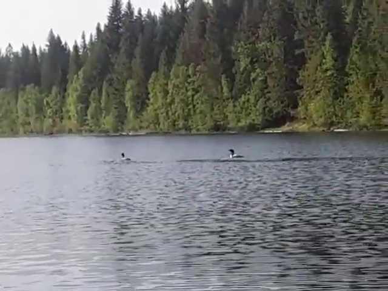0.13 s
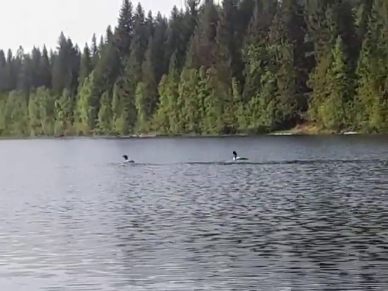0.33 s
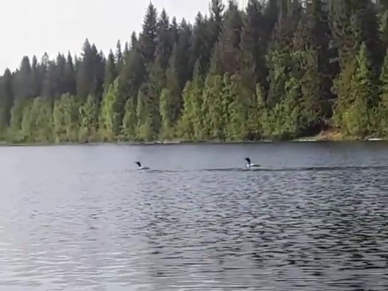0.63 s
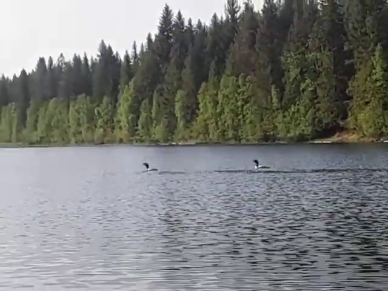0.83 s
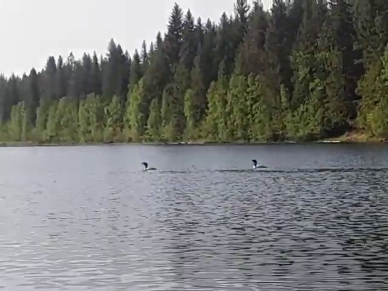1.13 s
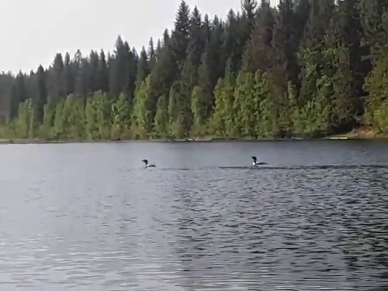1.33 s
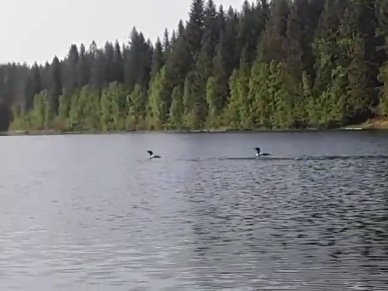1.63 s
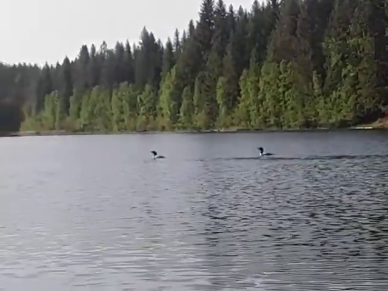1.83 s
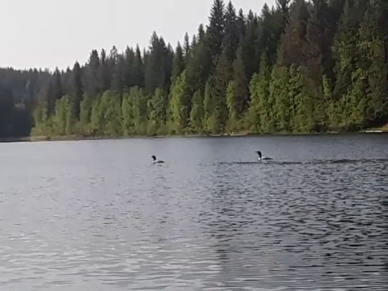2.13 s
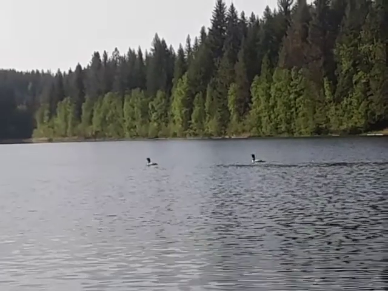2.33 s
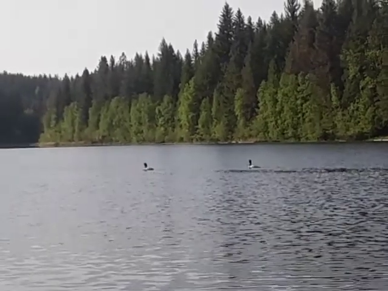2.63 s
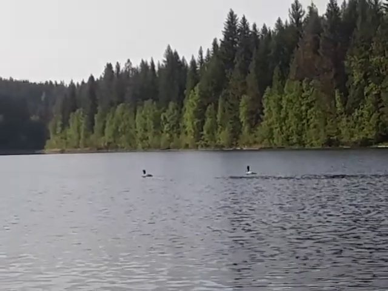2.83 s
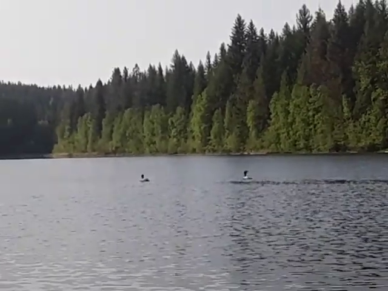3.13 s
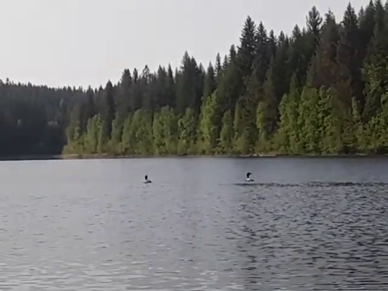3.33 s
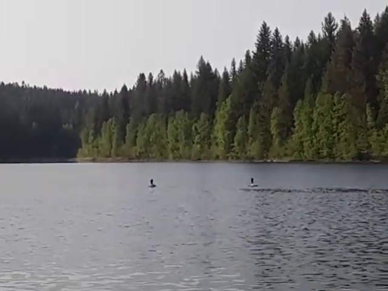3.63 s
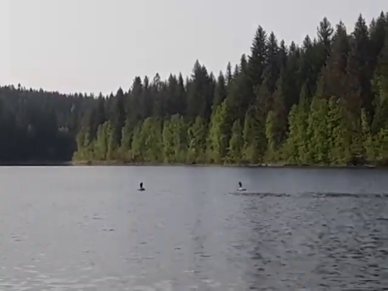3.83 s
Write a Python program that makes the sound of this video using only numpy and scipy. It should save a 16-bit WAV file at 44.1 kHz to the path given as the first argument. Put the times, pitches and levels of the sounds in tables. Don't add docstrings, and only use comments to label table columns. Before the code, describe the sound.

After a brief opening of hiss, low motor hum and a fading earlier echo, a pair of loons calls in wavering tremolo three times across an open lake, picked up by a small camera at a distance.

```python
import sys
import numpy as np
from scipy import signal
from scipy.fft import rfft, irfft
from scipy.io import wavfile
from scipy.ndimage import uniform_filter1d

SR = 44100
rng = np.random.default_rng(int(sys.argv[2]) if len(sys.argv) > 2 else 0)


def to_linear_factor(level_db):
    exponent = np.asarray(level_db, float) / 20
    return 10 ** exponent


def log_audio(samples):
    frames = np.atleast_2d(samples).T
    limited = np.clip(frames, -1, 1)
    pcm = np.round(limited * 32767).astype(np.int16)
    wavfile.write(sys.argv[1], SR, pcm)


N = 176400
LEAD_S = 1.2


def evened(x):
    return x / np.sqrt(np.mean(x ** 2) + 1e-20)


def read(points, hz):
    f, value = np.transpose(points)
    return np.interp(np.log(hz + 1), np.log(f + 1), value)


def coloured(x, points):
    count = x.shape[-1]
    return irfft(rfft(x) * to_linear_factor(read(points, np.fft.rfftfreq(count, 1 / SR))), count)


def smooth_noise(count, size):
    return evened(uniform_filter1d(uniform_filter1d(rng.standard_normal(count), size), size))


def ramp(t, seconds):
    return np.sin(np.pi / 2 * np.clip(t / seconds, 0, 1)) ** 2


# [f/Hz, level/dB per Hz]
HISS = [(25, -104), (60, -95.5), (130, -77.5), (320, -85.5), (700, -84), (1900, -109), (4000, -116),
        (15000, -118)]
# [f/Hz, likeness 0 to 1]
HISS_SAME = [(100, 0.99), (1500, .98), (4000, 0.96), (15000, .86)]


def hiss():
    hz = np.fft.rfftfreq(N, 1 / SR)
    left, other = rfft(rng.standard_normal((2, N)))
    ear_mix = np.clip(read(HISS_SAME, hz), 0, 1)
    right = ear_mix * left + np.sqrt(1 - ear_mix ** 2) * other
    return irfft(np.array([left, right]) * to_linear_factor(read(HISS, hz)) * np.sqrt(SR / 2), N)


# [f/Hz, width/Hz, level/dB]
MOTOR_BANDS = [(90.5, 14, -55.5), (107.05, 16, -51.5), (164.7, 18, -62), (207.15, 1.7, -55.5),
               (229.46, 15, -62), (310.05, 4.3, -70.5)]
# [t/s, level/dB]
RUMBLE_SWELL = [
    (0.0, -55),
    (1.22, -49),
    (1.37, -55.5),
    (2.24, -46.5),
    (2.26, -42),
    (3.27, -55),
    (3.3, -50),
    (3.98, -53),
    (4.0, -57.5),
]


def motor():
    hum_hz, hum_db, throb_db = 209.9, -54, 3.5
    hz = np.fft.rfftfreq(N, 1 / SR)
    swell_db = np.interp(np.arange(N) / SR, *np.transpose(RUMBLE_SWELL))
    swell_db = swell_db - np.mean(RUMBLE_SWELL, axis=0)[1]
    out = 0
    for f, width, db in MOTOR_BANDS:
        resonance = 1 / (1 + (2 * (hz - f) / width) ** 2) ** 1.3
        band = evened(irfft(rfft(rng.standard_normal(N)) * resonance, N))
        deep = f < 130
        out = out + to_linear_factor(db + deep * (swell_db + throb_db * smooth_noise(N, size=1500))) * band
    wavering_hz = hum_hz + 1.5 * smooth_noise(N, size=4000)
    hum = np.sin(2 * np.pi * np.cumsum(wavering_hz) / SR)
    return out + np.sqrt(2) * to_linear_factor(hum_db) * hum


# [f/Hz, level/dB]
SHORE_COLOUR = [(500, -16.5), (1100, -5), (1700, -6), (2500, 0), (5000, -26.5)]


def echo(x, start_s, rise_s, t60, ear_mix):
    t = np.arange(0, 3, 1 / SR)
    a, b = rng.standard_normal((2, len(t)))
    late = np.maximum(t - start_s, 0)
    both_ears = np.array([a + ear_mix * b, a - ear_mix * b])
    taps = both_ears * (1 - np.exp(-late / rise_s)) * to_linear_factor(-60 * late / t60)
    taps = coloured(taps / np.linalg.norm(taps[0]), SHORE_COLOUR)
    return signal.fftconvolve(x.mean(0)[None], taps, axes=1)[:, :x.shape[1]]


# [f/Hz, level/dB]
SHORE_DULL = [(1500, 1.5), (2400, -4), (4000, -11)]


def shore_echo(birds):
    tail = echo(birds, start_s=0.08, rise_s=0.46, t60=3.4, ear_mix=0.2)
    return to_linear_factor(-21.5) * coloured(tail, SHORE_DULL)


def far_echo(birds):
    return to_linear_factor(-28) * echo(birds, start_s=.56, rise_s=.04, t60=1.1, ear_mix=0.33)


def near_echo(birds):
    return to_linear_factor(-15.5) * echo(birds, start_s=0.004, rise_s=0.0013, t60=0.17, ear_mix=0.41)


MIDDLE_HZ, HIGH_HZ = 950, 1350
BREAK_S = .005
OVERTONES_DB = [
    (3, -20.5, -25, -27.5, -42, -38.5, -49.5, -56.5),
    (-28.5, -33.5, -49, -53.5, -57, -66, -77.5),
    (-46.5, -47.5, -47.5, -62, -52, -70),
]
DIP_DB = [
    -9,
    -2,
    -14,
]


def note(troughs, row, end, rise_s, fall_s, flips, bright_db, slope_db, throat, fades):
    start, crest_hz, drift, depth, level_db = row
    t = np.arange(start - BREAK_S / 2, end + BREAK_S / 2, 1 / SR)
    held, to_end = t - start, t - end
    register = int(crest_hz > MIDDLE_HZ) + int(crest_hz > HIGH_HZ)
    beat = np.interp(t, troughs, np.arange(len(troughs)))
    dip = (1 - abs(np.sin(np.pi * beat)) ** 1.4) ** 1.3
    hz = (crest_hz + drift * held) * (1 - depth * dip)
    hz = hz * (1 + 0.0026 * smooth_noise(len(t), size=150))
    hz = hz * (1 + flips * 0.055 * np.exp(to_end / 0.018))
    turn = 2 * np.pi * (np.cumsum(hz) / SR + rng.random())
    breath = to_linear_factor(-45) * smooth_noise(len(t), size=12)
    tone = np.sin(turn) * (1 + breath)
    for k, db in enumerate(OVERTONES_DB[register]):
        extra_db = bright_db + read(throat, (k + 2) * hz)
        extra_db = extra_db + (slope_db - 3 * held) * (k + 1)
        extra_db = extra_db - 10 * dip + flips * 48.5 * to_end
        extra_db = extra_db + 3.5 * smooth_noise(len(t), size=400)
        share = 1 if db < -10 else .4
        tone += to_linear_factor(db + extra_db * share) * np.sin((k + 2) * turn + k)
    swell_db = flips * (-5 + 30 * held) + fades * -29 * held
    shape = ramp(t - t[0], rise_s) * ramp(t[-1] - t, fall_s)
    return t[0], np.sqrt(2) * tone * shape * to_linear_factor(level_db + DIP_DB[register] * dip + swell_db)


TROUGHS = [
    [0.394, 0.481, 0.587, 0.683, 0.782, 0.889, 0.982, 1.122],
    [0.397, 0.481, .573, .669, .76, .854, .95, 1.054, 1.36],
    [2.002, 2.072, 2.175, 2.268, 2.37, 2.474, 2.57, 2.694],
    [1.93, 2.022, 2.092, 2.203, 2.297, 2.396, 2.5, 2.598, 2.698],
    [3.509, 3.608, 3.712, 3.808, 3.904, 4.003],
    [3.298, 3.388, 3.483, 3.574, 3.666, 3.764, 3.853, 3.96],
]
# [start t/s, crest f/Hz, drift/Hz per s, tremolo depth share, level/dB]
BIRD_A_1 = [
    (0.42, 749.6, 754.5, 0.126, -32),
    (0.55, 1221, -72.5, 0.15, -19.5),
    (1.012, 686.3, -362, 0.108, -35),
]
BIRD_B_1 = [
    (0.42, 714.8, 646.5, 0.14, -27),
    (0.542, 1173, 235.5, 0.174, -21.5),
    (0.608, 1463, -250, 0.124, -19),
    (0.956, 1177, -1150, 0.122, -22),
]
BIRD_A_2 = [
    (2.01, 727.2, 693.5, 0.17, -27),
    (2.204, 1243, -100, .16, -20),
    (2.6, 626.4, -79, 0.14, -40.5),
]
BIRD_B_2 = [
    (2.025, 741, 870, .138, -27.5),
    (2.155, 1231, -45.5, .198, -20.5),
    (2.5, 1100, -48.5, .13, -23),
    (2.598, 1079, -100, .15, -22),
]
BIRD_A_3 = [
    (3.569, 728, 780, 0.16, -29),
    (3.745, 1224, -47.5, 0.13, -19.5),
]
BIRD_B_3 = [
    (3.29, 791.6, 277.5, 0.17, -25),
    (3.378, 1212, -5, 0.18, -21),
    (3.51, 1474, -338, 0.154, -20),
    (3.863, 746, -37.5, 0.24, -31),
    (3.911, 1117, 49, 0.25, -23),
]
FAR_NOTE = [
    (1.922, 820, 100, .13, -50),
]
HICCUPS = [
    [(1.128, 660, -900, .02, -40)],
    [(2.688, 650, -500, .02, -43)],
]
# [end t/s, overtone level/dB, overtone slope/dB per partial as the head turns]
PHRASES = [
    (1.125, -1, 1.96),
    (1.1386, 3.5, -1.17),
    (2.695, -4.5, 1),
    (2.7, -8, 1),
    (4.05, 1.5, -3.5),
    (3.962, -2.5, -3),
    (2.01, -20.5, -4),
    (1.175, -21, -10.8),
    (2.735, -23.5, 1),
]
# [f/Hz, level/dB]
THROATS = [
    [(2000, 2), (2450, -1), (2900, -15), (3600, 4.5), (4300, -1), (5400, 3.5), (6300, -6), (7300, 0.5)],
    [(2000, -2), (2450, 4), (2900, -10.5), (3300, 7.5), (3800, -1.5), (4400, 2.5), (5400, 4.5),
     (7000, -8.5)],
]


def loons():
    earlier_s, earlier_db, pan_db = 1.58, 1, .6
    out = np.zeros((2, N + round((LEAD_S + .2) * SR)))
    troughs_sung = TROUGHS + [TROUGHS[3], TROUGHS[0], TROUGHS[2]]
    notes_sung = (BIRD_A_1, BIRD_B_1, BIRD_A_2, BIRD_B_2, BIRD_A_3, BIRD_B_3, FAR_NOTE, *HICCUPS)
    sung = list(zip(troughs_sung, notes_sung, PHRASES, THROATS * 5))
    calls = [(phrase, 0) for phrase in sung] + [(phrase, earlier_s) for phrase in sung[:2]]
    for (troughs, notes, (end, bright_db, slope_db), throat), shift in calls:
        lag = 0 if throat is THROATS[0] else 1
        for k, row in enumerate(notes):
            last = k == len(notes) - 1
            flips = not last and row[1] < MIDDLE_HZ < notes[k + 1][1]
            drops = not last and notes[k + 1][1] < MIDDLE_HZ < row[1]
            note_end = end if last else notes[k + 1][0]
            rise_s = BREAK_S if k else 0.023
            fall_s = 0.036 if last or drops else BREAK_S
            fades = last and end < N / SR
            s, sound = note(troughs, row, note_end, rise_s, fall_s, flips, bright_db - 2 * last,
                            slope_db, throat, fades)
            at = round((s - shift + LEAD_S) * SR)
            for ear, (delay, ear_db) in enumerate([(0, pan_db / 2), (lag, -pan_db / 2)]):
                first = at + delay
                out[ear, first:first + len(sound)] += sound * to_linear_factor(ear_db + earlier_db * (shift > 0))
    return out


def scene():
    birds = loons()
    lake = birds + shore_echo(birds) + far_echo(birds) + near_echo(birds)
    opening = round(LEAD_S * SR)
    return lake[:, opening:][:, :N] + hiss() + motor()


def roll_off(x):
    return signal.sosfilt(signal.butter(12, 15720, fs=SR, output="sos"), x)


def record(dry):
    return roll_off(dry)


dry = scene()
out = record(dry)
log_audio(out)
```